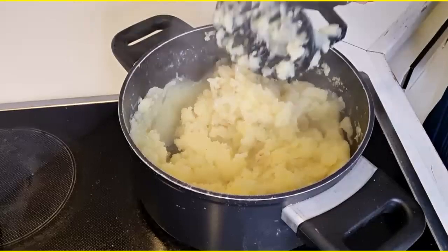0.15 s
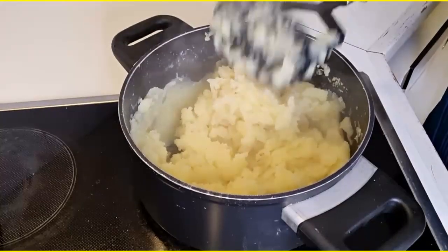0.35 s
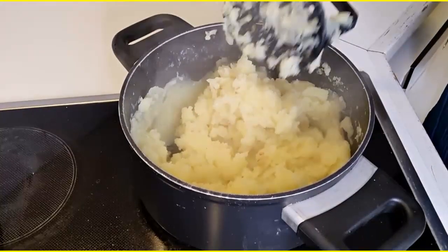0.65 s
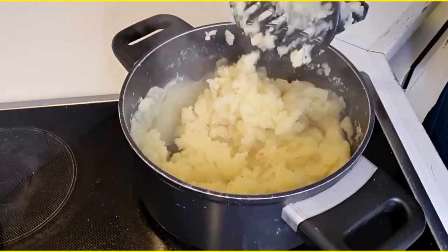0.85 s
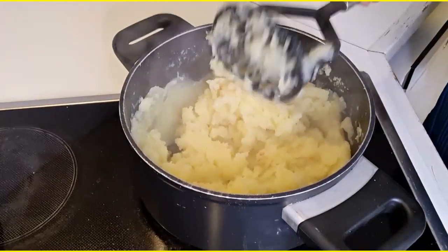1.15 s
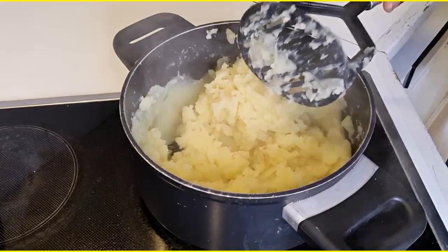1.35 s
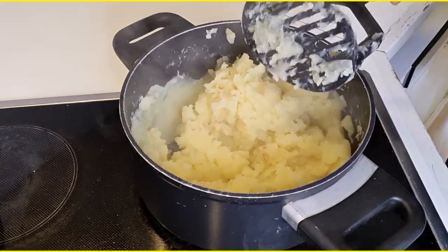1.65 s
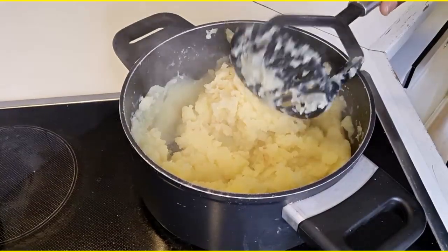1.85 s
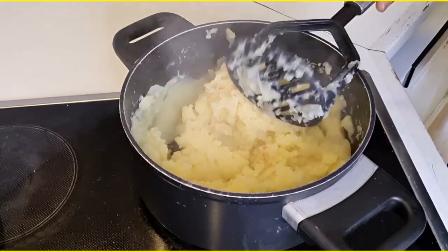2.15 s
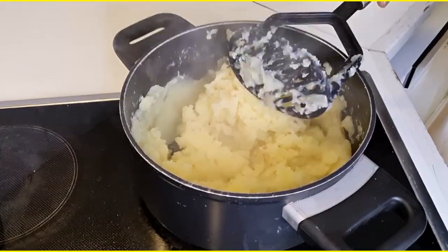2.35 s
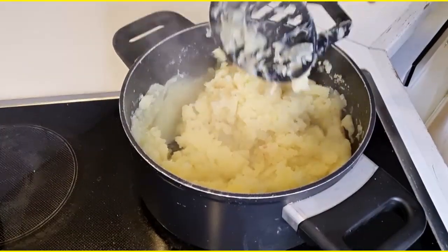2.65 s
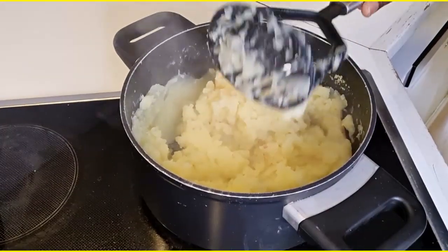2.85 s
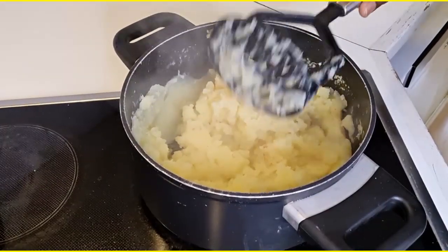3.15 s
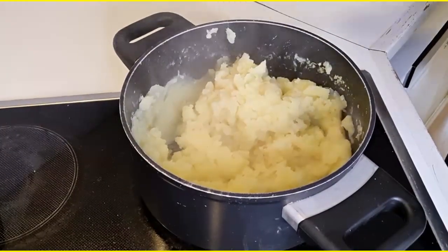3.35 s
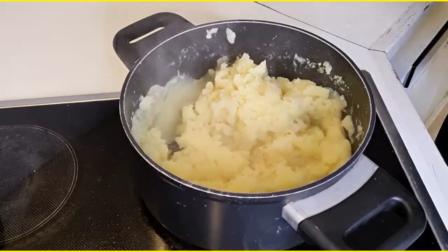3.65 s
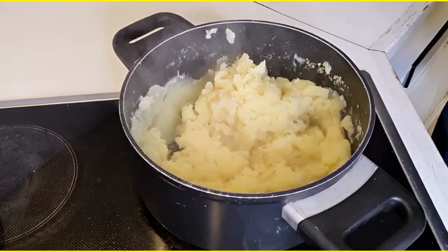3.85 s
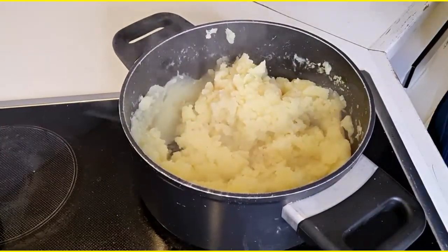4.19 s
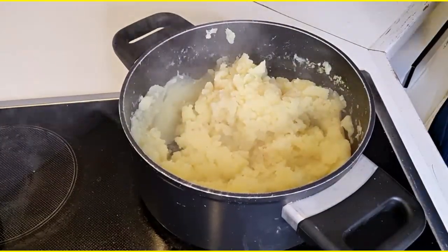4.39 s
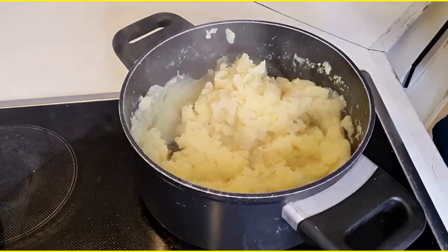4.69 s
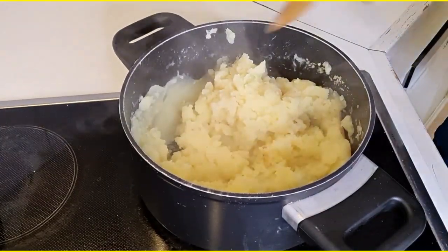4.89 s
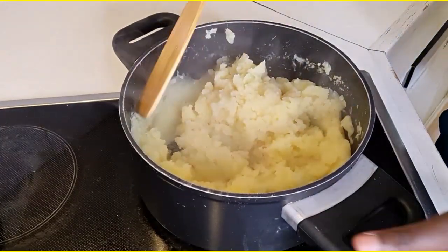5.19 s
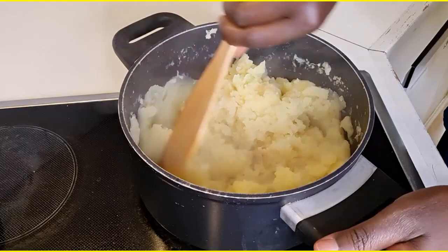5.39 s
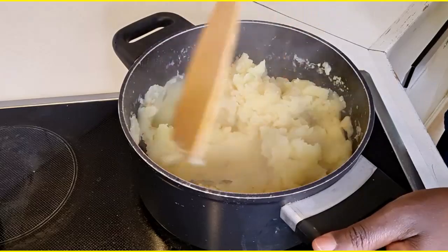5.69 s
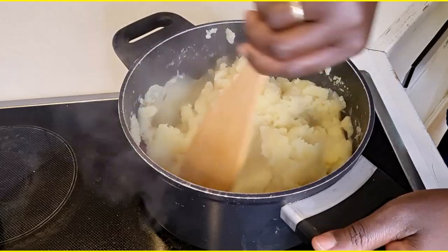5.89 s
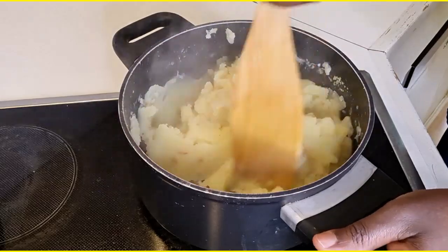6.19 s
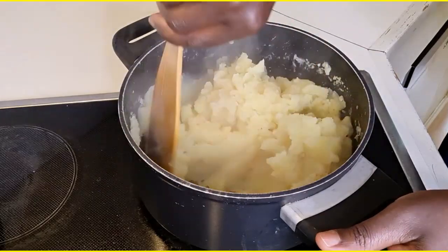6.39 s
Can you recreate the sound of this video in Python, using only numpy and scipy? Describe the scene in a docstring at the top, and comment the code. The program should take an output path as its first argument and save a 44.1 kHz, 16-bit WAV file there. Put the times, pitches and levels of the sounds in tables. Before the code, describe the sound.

Bright, chattering steel cracks with a short dull pot ring and a low shake of the hob come in quick runs, the last ones duller and more hollow. After a pause come small worktop thuds with a brief metallic ring, then tiny scrapes and much quieter spoon bumps with squelchy stirring. Close stereo phone microphone, short kitchen reverberation, faint background hiss and hum.

```python
"""A masher is knocked in quick runs on the rim of a pot of mash: each blow is a chattering noise crack with
steel modes, a damped pot ring, a small landing and a low shake of the hob. Things are then laid on the worktop
as filtered ticks, clatter and decaying modes; two dry scrapes follow, and a wooden spoon bumps the pot and stirs
as soft modes, torn grains and banded noise. A small kitchen echoes, over faint hiss and a far-off motor hum."""
import sys
import numpy as np
from scipy import signal
from scipy.fft import rfft, irfft
from scipy.io import wavfile
from scipy.ndimage import uniform_filter1d

SR = 44100
rng = np.random.default_rng(int(sys.argv[2]) if len(sys.argv) > 2 else 0)


def log_audio(samples):
    """Write samples as a 16-bit WAV file to the path given in sys.argv[1]."""
    # one column per channel
    frames = np.atleast_2d(samples).T
    # limit to full scale, then quantise
    limited = np.clip(frames, -1, 1)
    pcm = np.round(limited * 32767).astype(np.int16)
    wavfile.write(sys.argv[1], SR, pcm)


N = 288149
LEAD = 4410  # samples of run-in, so that a blow may start before time zero
M = N + LEAD
T = (np.arange(M) - LEAD) / SR
BLOW = 13230  # samples in one blow

# masher on the rim: start_s, strength_db, dullness_db, pot_body_db, hob_shake_db, body_tilt_db_per_octave
KNOCKS = [(-.045, -24.5, 0, -24.5, -42.5, 2.5), (0.1353, -24, 0, -31, -37.5, -3),
          (0.2844, -30, 2.5, -27.5, -38.5, 1.7), (0.4665, -26, -1, -28.5, -41, -1),
          (0.6386, -25, -1, -31, -39, 4), (0.8272, -25, 2, -28, -36.5, 1.7),
          (1.0177, -22, -.6, -24.5, -34, 2.1), (1.2238, -21, .6, -24.5, -35.5, 1.5),
          (1.9122, -31, 2.2, -37, -45, -4), (2.0654, -25, -2.5, -28.5, -36.5, .1),
          (2.2155, -26, 2.5, -28, -36.5, .6), (2.3901, -23, 4.5, -28, -38.5, -.6),
          (2.6475, -20.5, 0, -22, -36, .6), (2.871, -28.5, 11, -17.5, -35.5, -1),
          (3.0137, -26, 6, -18, -38.5, -1.5), (3.1973, -27.5, 8, -20.5, -41.5, -.6)]
# colour of the steel crack, shape only: freq_hz, density_db_per_hz
CRACK = [(300, -26), (500, -5), (1000, -8.5), (2000, -7.5), (3100, -7.5), (4200, -6.5), (4900, 0.5),
         (5800, -3.5), (7000, -6.5), (8200, -1.5), (9500, -10), (12500, -9), (15300, -21), (16500, -27)]
# pot wall damped by mash: pitch_hz, relative_level_db, t60_s
POT = [(212, -.6, .27), (305, -.8, 0.2), (364, 1.5, .15), (436, .6, 0.12), (510, -9, 0.13),
       (719, -17.5, 0.22), (864, -14, .08), (1039, -14, 0.13)]
# masher steel: pitch_hz, relative_level_db, t60_s
STEEL = [(1904, -11, .04), (2618, -1.5, 0.12), (5170, -1, 0.15), (4920, -11.5, .05), (6600, -4.5, .04),
         (8160, -6.5, 0.21), (8300, -7, 0.21)]
# hob glass and cabinet: centre_hz, width_hz, relative_level_db
HOB = [(35.65, 18.5, 3.5), (59, 30, 3.5), (94.7, 45, -.6), (149.3, 85, -12)]
# things laid on the worktop: start_s, tick_db, clatter_db, tool_ring_db, share_of_free_ring_time,
# thud_db, thud_tilt_db_per_octave
LAID = [(3.8273, -44, -48.5, -40, .6, -38, 3), (3.9693, -39.5, -43, -29.5, .9, -32, 2.2),
        (4.0009, -55, -46.5, -37.5, .7, -22.5, -3.5), (4.3955, -60, -59, -47, .22, -31.5, 5)]
# worktop modes: pitch_hz, relative_level_db, t60_s
WORKTOP = [(119.3, 0, 0.19), (215, -2, 0.23), (256.5, 1.5, 0.17), (367, -8.5, .1), (416, -8, .1),
           (572, -9.5, 0.12)]
# modes of the tool ringing freely: pitch_hz, relative_level_db, t60_s
TOOL = [(1090, 0, .17), (1250, -6, .07), (1530, -2, .1), (1650, -6, .1), (2125, -8, .28), (2780, -11, .14)]
# spoon against the pot wall: start_s, level_db, pitch_share of the SPOON modes, tilt_db_per_octave
BUMPS = [(5.242, -37, 0.95, -3.2), (5.361, -41, 0.98, -3), (5.817, -42.5, 0.93, 5), (5.988, -54, 0.94, 9),
         (6.372, -52.5, 0.91, 3)]
# spoon bump modes before each bump scales the pitch: pitch_hz, relative_level_db, t60_s
SPOON = [(241, -5, 0.19), (281, 15, 0.1), (349, 1.5, 0.21), (480, -24, 0.071), (690, -5, 0.15),
         (1026, 2.5, 0.038)]
# stirring: time_s, mash_squelch_db, wall_drag_db, pot_shift_on_hob_db, wet_hiss_db
STIR = [(5.2, -83, -80, -84, -84), (5.214, -80, -72, -92, -71), (5.254, -65, -62, -66, -63),
        (5.344, -72, -70, -76, -68), (5.366, -65, -59, -64, -60), (5.454, -64, -63, -64, -63),
        (5.496, -57, -56, -52, -59), (5.558, -67, -61, -66, -63), (5.7, -76, -85, -81, -71),
        (5.796, -93, -77, -82, -81), (5.818, -57, -55, -74, -65), (5.844, -67, -54, -60, -64),
        (5.97, -71, -72, -81, -68), (6.0, -63, -59, -65, -62), (6.052, -61, -58, -61, -63),
        (6.114, -72, -68, -79, -68), (6.136, -76, -73, -75, -64), (6.328, -93, -90, -98, -82),
        (6.38, -74, -63, -81, -69), (6.53, -64, -65, -52, -62)]
# short dry scrapes: start_s, length_s, level_db
RUBS = [(4.75, .05, -55), (4.812, .045, -62)]
# colour of the scrapes: freq_hz, density_db_per_hz
RUB_COLOUR = [(880, -29), (1500, -4.5), (1670, -6), (2510, -11), (2970, 3), (3410, -14.5), (4970, 3),
              (5540, -4), (8400, 0), (16000, -1.5)]
# wet ticks: start_s, level_db, pitch_hz
POPS = [(6.0921, -47, 11450), (6.128, -49, 11700), (6.2394, -52, 12000), (6.2567, -47, 14400),
        (6.3056, -57, 10200)]
# kitchen echo decay: freq_hz, t60_s
ROOM = [(60, 0.27), (200, 0.42), (550, 0.35), (1500, 0.41), (4000, 0.39), (10000, 0.3), (16000, 0.45)]
# colour of the steady hiss, shape only: freq_hz, density_db_per_hz
FLOOR = [(22, -27), (48, -9), (70, -16), (100, -8), (130, -25), (300, -22), (600, -25), (1150, -18),
         (1600, -24), (2600, -29.5), (4200, -25), (6500, -22.5), (8000, -20.5), (15500, -20)]
# motor hum far off: centre_hz, width_hz, mean_level_db
HUM = [(99, 4, -80), (1190, 220, -83), (600, 120, -91)]
# balance of the two microphone ports: freq_hz, left_minus_right_db
PORT_BALANCE = [(60, 0), (110, -4.5), (200, -1), (380, 1), (700, -1.5), (1290, -2.5), (2380, 0.5),
                (4400, -2), (8120, -2.5), (15000, -4.5)]
# how unlike the ports hear the rim and worktop: freq_hz, side_minus_mid_db
PORT_SIDE = [(60, -8), (110, -8.5), (200, -13), (380, -12), (700, -3.5), (1290, 0), (2380, -1), (4400, 1),
             (8120, -4), (15000, -4)]
# the same for the spoon and the quiet kitchen: freq_hz, side_minus_mid_db
PORT_SIDE_AHEAD = [(60, -10.5), (110, -4.5), (200, -11), (380, -6), (700, 0), (1290, -2.5), (2380, -1),
                   (4400, 3), (8120, -7.5), (15000, -19)]

ROOM_DB, FLOOR_DB = -10.5, -67
TOP_HZ = 16000
# a dull blow gains around 2 kHz and loses the top
CLACK_DB, CLACK_PER_DULL, SHIMMER_DB = 2.5, .55, .2
# a harder blow chatters longer
CHATTER_S, CHATTER_S_PER_DB, USUAL_BLOW_DB = .0066, .0003, -25
# a dull blow wakes the pot's hollow modes
HOLLOW_LOW_HZ, HOLLOW_HIGH_HZ, HOLLOW_PER_DULL = 330, 470, .9
# the pot lands again this late, this far under the blow, and more softly if the blow is dull
SETTLE_S, SETTLE_DB, SETTLE_PER_DULL = .03, -14, -.4
# each crack also scatters off the pot and reaches the ports unalike
STRAY_S, STRAY_DB, STEP_SHARE = .003, -2.2, .75
# half width of the push on the hob; levels against the hob shake
THUMP_S, THUMP_DB, RUMBLE_DB = .0045, 13, -2.2
# the push peaks this late and comes once more, weaker
THUMP_AT_S, REBOUND_S, REBOUND_DB = .024, .042, -5
BUMP_CONTACT_S = .0017
RUB_TAIL_S, RUB_TAIL_DB = .05, -11


def undb(db):
    """Decibels to amplitude."""
    return 10 ** (np.asarray(db) / 20)


def unit(x):
    """Scale to rms 1."""
    return x / np.sqrt(np.mean(x ** 2))


def white(size=M):
    """Plain noise with equal energy at every pitch."""
    return rng.standard_normal(size)


def on_hz(table, size):
    """Read a table of values against Hz at every spectrum bin."""
    hz, value = np.transpose(table)
    return np.interp(np.log(np.fft.rfftfreq(size, 1 / SR) + 1), np.log(hz), value)


def hiss(table):
    """Noise of a given spectrum, rms 1."""
    return unit(irfft(rfft(white()) * undb(on_hz(table, M)), M))


def band(x, lo_hz, hi_hz):
    """Keep what lies between two frequencies."""
    sos = signal.butter(2, [lo_hz, min(hi_hz, .45 * SR)], "band", fs=SR, output="sos")
    return signal.sosfilt(sos, x)


def noise_band(lo_hz, hi_hz, size=M):
    """Band of noise, rms 1."""
    return unit(band(white(size), lo_hz, hi_hz))


def walk(rate):
    """Random levels slewed at about rate per second, rms 1."""
    k = int(SR / rate)
    steps = np.repeat(white(M // k + 1), k)
    return unit(uniform_filter1d(uniform_filter1d(steps, k), k)[:M])


def even(x, size):
    """Spectrum of a noise burst with its chance peaks and holes levelled."""
    bins = rfft(x)
    power = np.abs(bins) ** 2
    return bins * np.sqrt(power.mean() / uniform_filter1d(power, size))


def tilted(modes, db_per_octave, share=1):
    """The same modes struck at another spot: upper ones stronger or weaker, pitch scaled."""
    return [(hz * share, db + db_per_octave * np.log2(hz / 300), t60) for hz, db, t60 in modes]


def ring(modes, contact_s, scatter_db, rough):
    """One blow on a set of modes, peak 1; loose contact makes phases wander, a long one swells in softly."""
    hz, db, t60 = np.transpose(modes)[:, :, None]
    level_chance, phase = white((2, len(modes), 1))
    t = np.arange(BLOW) / SR
    wander = rough * np.sqrt(hz / SR) * np.cumsum(white((len(modes), BLOW)), axis=1)
    decay = undb(db + scatter_db * level_chance - 60 * t / t60)
    x = (decay * np.sin(2 * np.pi * hz * t + phase + wander)).sum(axis=0)
    x = x * (1 - np.exp(-t / contact_s))
    return x / np.abs(x).max()


def burst(hold_s, fall_s, size=BLOW):
    """Envelope of a chattering contact: quick rise, short hold, fall."""
    t = np.arange(size) / SR
    return np.minimum(t / .0004, 1) * np.exp(-np.maximum(t - hold_s, 0) / fall_s)


def add(out, s, x):
    """Mix a sound in at a time in seconds."""
    i = max(int(s * SR) + LEAD, 0)
    out[i:i + len(x)] += x[:M - i]


def motor_hum():
    """Far-off motor: narrow noise bands whose levels waver."""
    return sum(undb(db + 2 * walk(6)) * noise_band(f - w / 2, f + w / 2) for f, w, db in HUM)


def floor():
    """Microphone hiss and a quiet kitchen with its hum; rows are mid and side."""
    return undb(FLOOR_DB) * np.array([hiss(FLOOR), hiss(FLOOR)]) + motor_hum() * np.array([[1], [.3]])


def kitchen(x):
    """Dense echoes that die band by band; rows are what both ports share and what sets them apart."""
    size, echoes = 22050, 0
    t = np.arange(size) / SR
    hz, t60 = np.transpose(ROOM)
    for f in 40 * 2 ** np.arange(0, 9, .5):  # half-octave bands
        noise = band(white((2, size)), f / 2 ** .25, f * 2 ** .25)
        fall_db = -60 * t / np.interp(np.log(f), np.log(hz), t60)
        beyond_door = undb(-30 + 0.28 * fall_db)  # a faint slower tail
        echoes = echoes + noise * (undb(fall_db) + beyond_door)
    echoes = echoes * np.minimum(t / 0.002, 1)
    echoes = echoes / np.sqrt(np.sum(echoes ** 2) / 2)
    return signal.fftconvolve(x[None], echoes, axes=1)[:, :M]


def ports(direct, mid, side, table):
    """Direct sound reaches the ports with a phase step, diffuse sound as two partly unrelated signals."""
    unlike, tilt = undb(on_hz(table, M)), undb(on_hz(PORT_BALANCE, M) / 2)
    sign = np.array([[1], [-1]])  # left, right
    stepped = rfft(direct) * (1 - 1j * STEP_SHARE * sign * unlike)
    both = stepped + rfft(mid) + sign * unlike * rfft(side)
    return irfft(both * tilt ** sign, M)


def rubs():
    """Dry scrapes of coloured noise: each swells and fades over its length and leaves a faint tail."""
    gain = 0
    for s, length, db in RUBS:
        swell = np.sin(np.pi * np.clip((T - s) / length, 0, 1))
        middle = s + length / 2
        tail = (T > middle) * np.exp(-np.abs(T - middle) / RUB_TAIL_S)
        gain = gain + undb(db) * (swell + undb(RUB_TAIL_DB) * tail)
    return gain * hiss(RUB_COLOUR) * undb(1.4 * walk(200))


def stirring():
    """Torn grains squelch and hiss, low noise drags on the wall; the pot's deep shifting comes apart."""
    shift = noise_band(30, 58)
    drag = unit(band(white(), 70, 240) * undb(3 * walk(40)))
    grain_levels = undb(np.minimum(4 * rng.exponential(size=M), 12))
    grains = (rng.random(M) < 900 / SR) * grain_levels * white()  # about 900 a second
    lumps = undb(1.7 * walk(120))  # the mash tears unevenly
    squelch = unit((unit(band(grains, 350, 1580)) + 1.7 * noise_band(400, 1900)) * lumps)
    wet = unit((0.45 * unit(band(grains, 1900, 15000)) + noise_band(2800, 15500)) * lumps)
    s, *levels = np.transpose(STIR)
    squelch_db, drag_db, shift_db, wet_db = (np.interp(T, s, v, -200) for v in levels)
    stir = undb(squelch_db) * squelch + undb(wet_db) * wet + undb(drag_db) * drag
    return stir, undb(shift_db) * shift


def spoon_bumps():
    """Soft wooden contact sets a few short modes ringing."""
    out = np.zeros(M)
    for s, db, share, tilt in BUMPS:
        add(out, s, undb(db) * ring(tilted(SPOON, tilt, share), BUMP_CONTACT_S, 1.9, 0.11))
    return out


def wet_ticks():
    """Tiny high bursts of band noise in the mash."""
    out = np.zeros(M)
    for s, db, hz in POPS:
        pop = band(white(900), 0.84 * hz, 1.4 * hz) * burst(0.00062, 0.0013, size=900)
        add(out, s, undb(db) * pop)
    return out


def laid_down():
    """A tick, a clatter, the tool's short ring and the worktop's thud."""
    out = np.zeros(M)
    for s, tick_db, clatter_db, ring_db, free, thud_db, tilt in LAID:
        noise = white(BLOW)
        tick = unit(band(noise, 1740, 5800)) * (burst(0.0027, 0.0021) + 0.14 * burst(0.014, 0.09))
        clatter = unit(band(noise, 600, 1800)) * (burst(0.0076, 0.018) + 0.31 * burst(0.038, 0.092))
        tool = ring([(hz, db, free * t60) for hz, db, t60 in TOOL], .0005, 1.5, .11)
        thud = ring(tilted(WORKTOP, tilt), 0.0017, 1.6, 0.5)
        add(out, s, undb(tick_db) * tick + undb(clatter_db) * clatter)
        add(out, s, undb(ring_db) * tool + undb(thud_db) * thud)
    return band(out, 50, 16000)


def hob_rumble():
    """The hob shudders: low noise bands swell in and die away in two slopes, rms 1."""
    t, noise = np.arange(BLOW) / SR, white(BLOW)
    rise = 1 - np.exp(-(t / .016) ** 2)
    fall = (undb(-60 * t / 0.4) + 1.1 * undb(-60 * t / 0.15)) / (1 + (t / 0.25) ** 8)
    bands = sum(undb(db) * unit(band(noise, f - w / 2, f + w / 2)) for f, w, db in HOB)
    return unit(rise * fall * bands)


def add_thumps(shake, s, hob_db):
    """The landing pushes the hob down in one smooth pulse, then again more weakly."""
    peak_s = .015  # where the pulse peaks within its own buffer
    thump = np.exp(-((np.arange(BLOW) / SR - peak_s) / THUMP_S) ** 2)
    add(shake, s + THUMP_AT_S - peak_s, undb(hob_db + THUMP_DB) * thump)
    add(shake, s + THUMP_AT_S + REBOUND_S - peak_s, undb(hob_db + THUMP_DB + REBOUND_DB) * thump)


def pot_landing(db, dull):
    """The pot rocks and lands back on the glass as a short low-mid noise burst."""
    level = undb(db + SETTLE_DB + SETTLE_PER_DULL * dull)
    return level * noise_band(130, 750, BLOW) * burst(0.0041, 0.017)


def pot_ring(dull, tilt):
    """The mash-damped wall rings on short modes, the hollow ones stronger for a dull blow."""
    wall = []
    for hz, db, t60 in tilted(POT, tilt):
        hollow = HOLLOW_LOW_HZ < hz < HOLLOW_HIGH_HZ
        wall.append((hz, db + HOLLOW_PER_DULL * dull * hollow, t60))
    return ring(wall, 0.0005, 1.2, 0.2)


def steel_crack(db, dull):
    """Steel chatters on the rim in gated noise, rattles on quietly and rings its own modes."""
    hold_s = max(CHATTER_S + CHATTER_S_PER_DB * (db - USUAL_BLOW_DB), .003)
    bounces = undb(2.5 * np.repeat(white(BLOW // 30), 30))  # contact comes and goes
    contact = bounces * burst(hold_s, 0.0024) + undb(-19.5) * burst(.01, 0.068)
    chatter = even(unit(white(BLOW) * contact), size=110) * undb(on_hz(CRACK, BLOW) - 8.5)
    steel = undb(-10) * rfft(ring(STEEL, 0.0013, 2.5, .45))
    colour = [(2200, CLACK_DB + CLACK_PER_DULL * dull), (4400, 0), (8400, 0), (11000, SHIMMER_DB - dull)]
    crack = irfft((chatter + steel) * undb(db + on_hz(colour, BLOW)), BLOW)
    return crack * (np.arange(BLOW) / SR < .25)  # drop the end of the buffer


def stray_crack(crack):
    """The crack smeared by a short decaying scatter off the pot."""
    scatter = white(600) * burst(0, STRAY_S, size=600)
    return undb(STRAY_DB) * signal.fftconvolve(crack, scatter / np.sqrt(np.sum(scatter ** 2)))


def knocks():
    """Each blow cracks and rings the pot; the landing and the hob's shudder follow a moment later."""
    air, shake, stray = np.zeros((3, M))
    for s, db, dull, body_db, hob_db, tilt in KNOCKS:
        crack = steel_crack(db, dull)
        add(air, s, crack + undb(body_db) * pot_ring(dull, tilt))
        add(stray, s, stray_crack(crack))
        add(air, s + SETTLE_S, pot_landing(db, dull))
        add(shake, s, undb(hob_db + RUMBLE_DB) * hob_rumble())
        add_thumps(shake, s, hob_db)
    return air, shake, stray


def scene():
    """Rim and worktop, then spoon and quiet kitchen, each with its own spread across the ports."""
    air, shake, stray = knocks()
    air = air + laid_down()
    stir, shift = stirring()
    stir = stir + spoon_bumps() + wet_ticks() + rubs()
    mid, side = undb(ROOM_DB) * kitchen(air + stir)
    rim = ports(air + shake, mid, side + stray, PORT_SIDE)
    ahead = ports(stir + shift, *floor(), PORT_SIDE_AHEAD)
    return (rim + ahead)[:, LEAD:]


def record(dry):
    """The phone drops the deepest bass and cuts the top."""
    x = signal.sosfilt(signal.butter(3, 29, "high", fs=SR, output="sos"), dry)
    return signal.sosfilt(signal.ellip(10, .3, 70, TOP_HZ, fs=SR, output="sos"), x)


dry = scene()
out = record(dry)
log_audio(out)
```